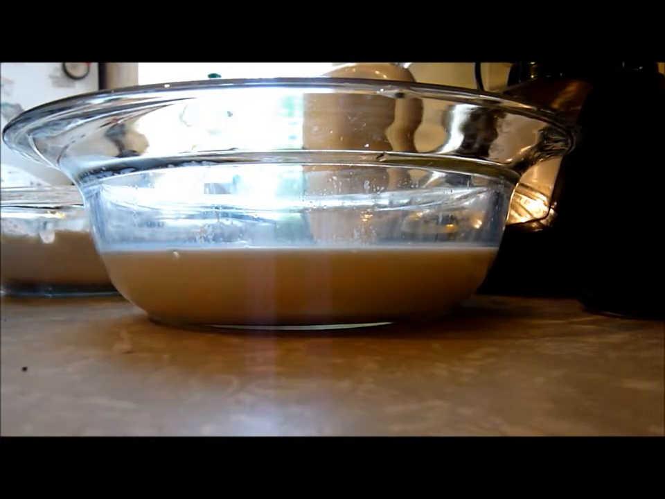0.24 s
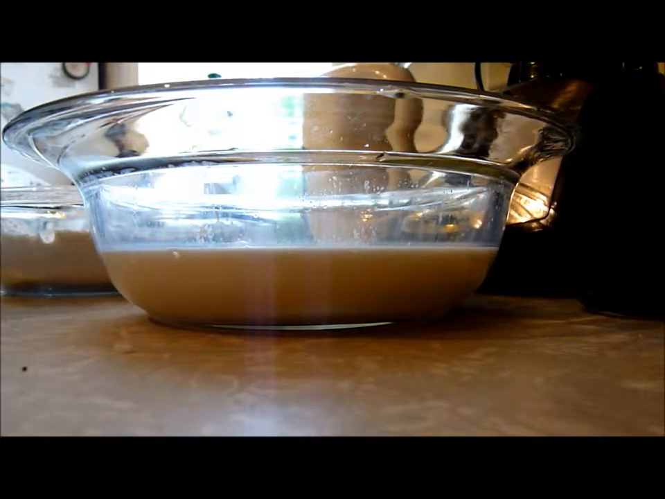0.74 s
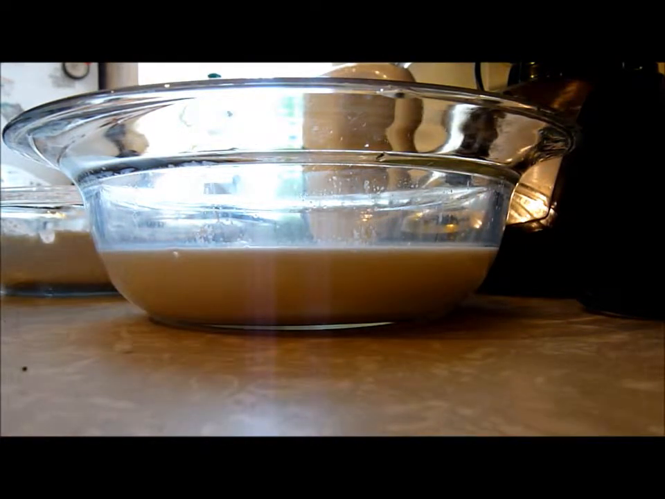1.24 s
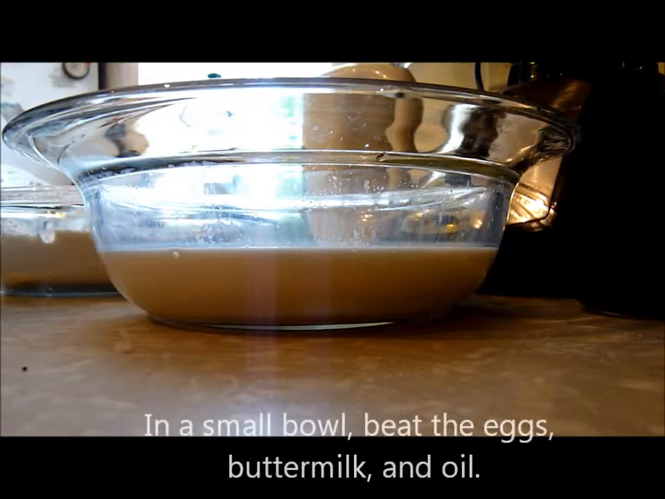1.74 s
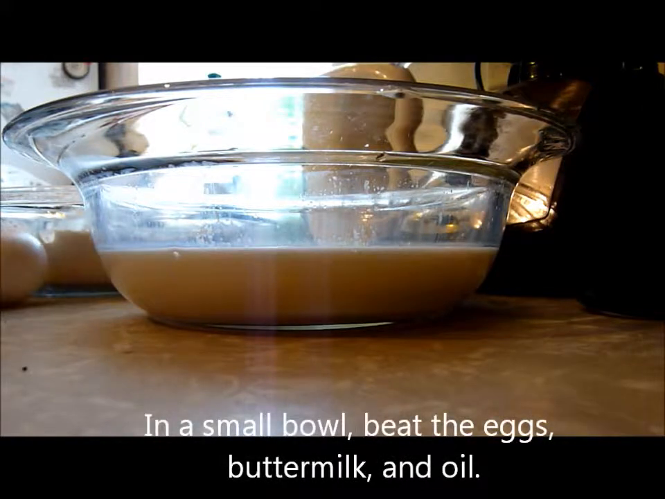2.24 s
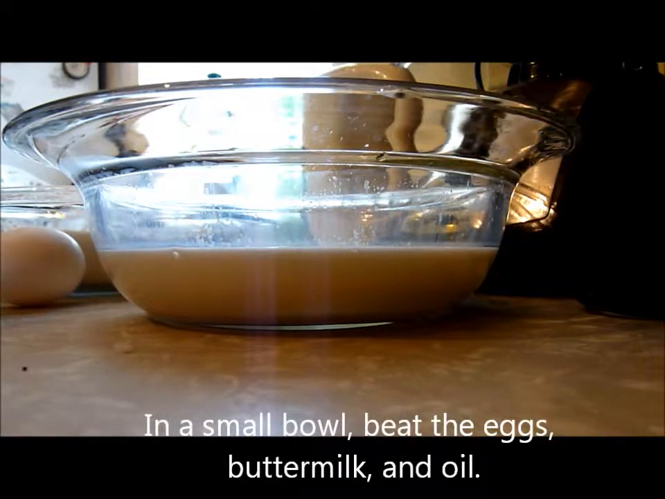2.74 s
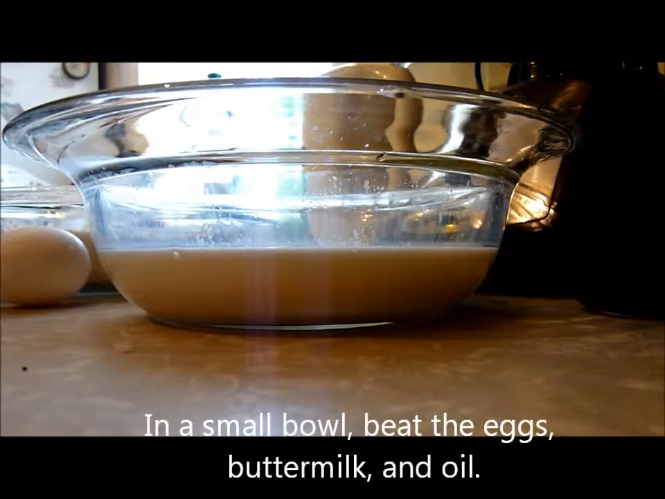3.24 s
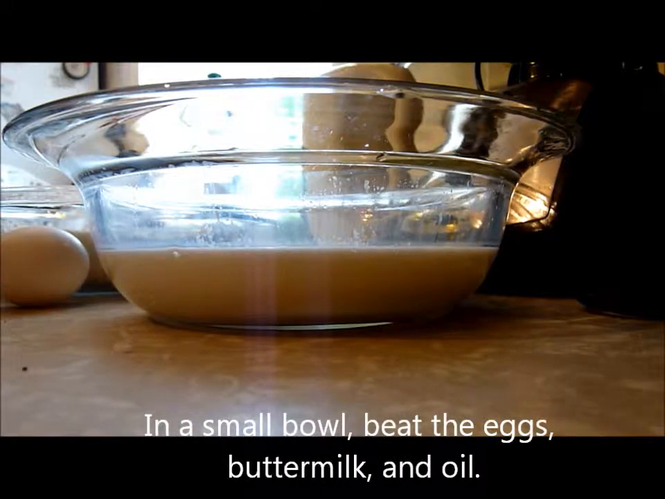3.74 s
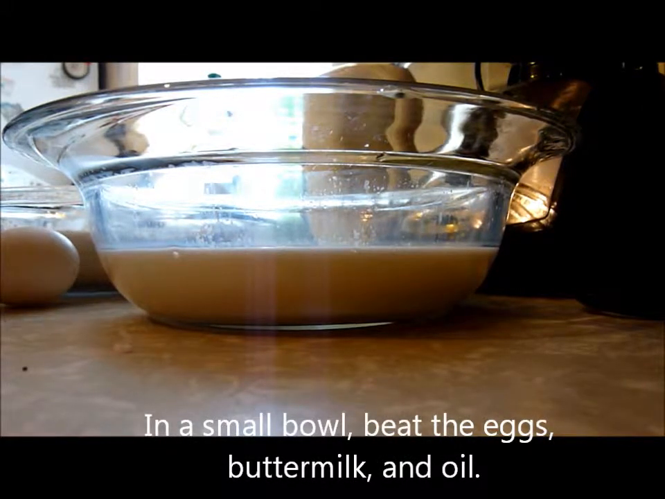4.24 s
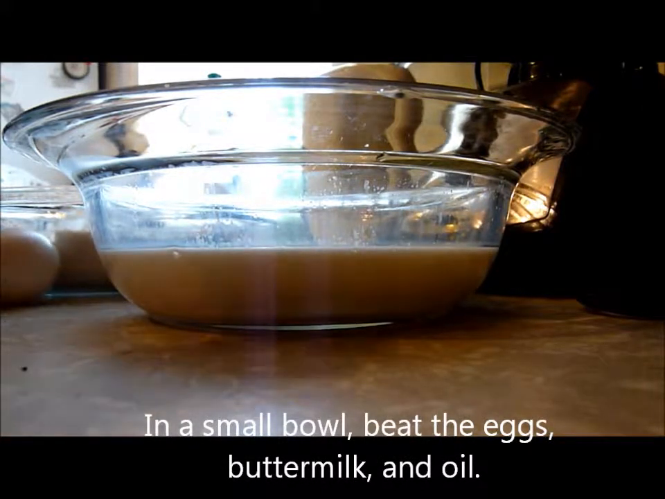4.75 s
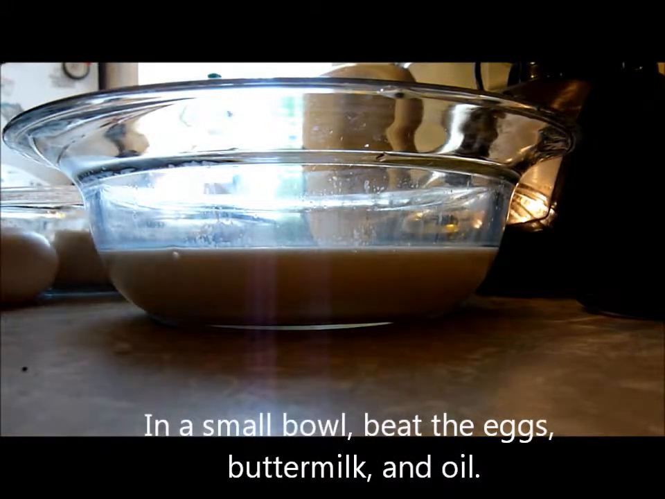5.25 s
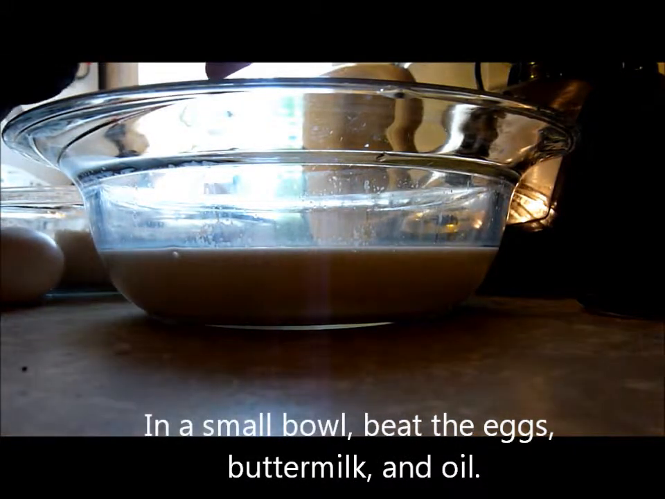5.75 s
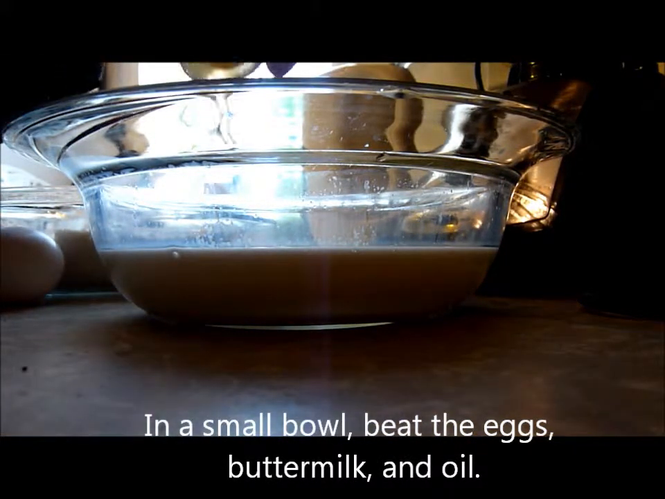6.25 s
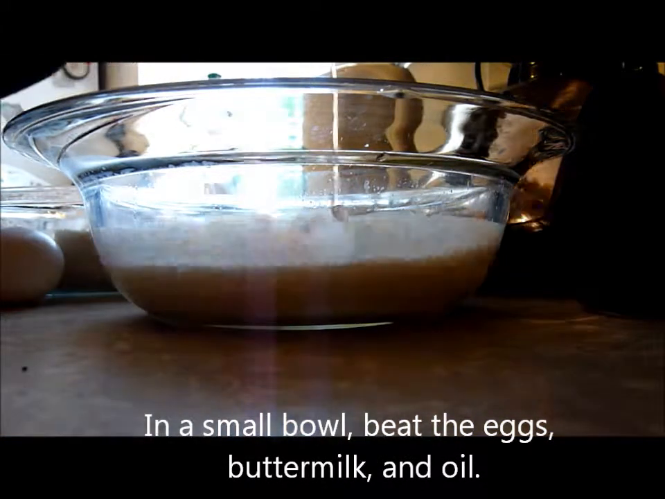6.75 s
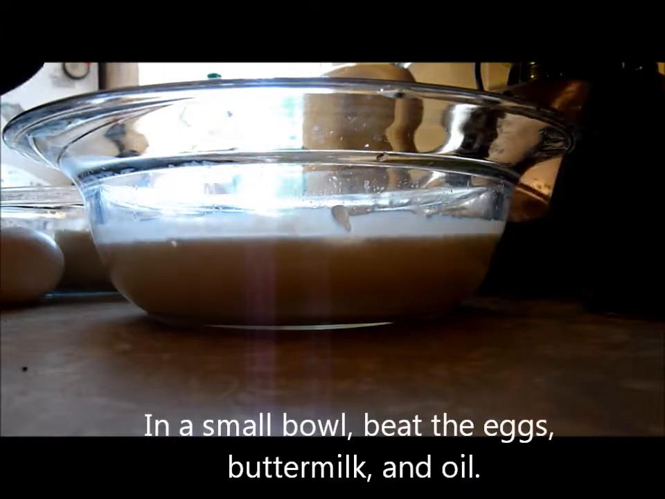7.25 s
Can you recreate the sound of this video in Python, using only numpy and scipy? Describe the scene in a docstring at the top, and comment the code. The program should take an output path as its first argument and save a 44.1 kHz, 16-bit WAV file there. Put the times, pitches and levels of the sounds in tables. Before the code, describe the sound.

A dish rattles down, then an egg is knocked five times on a worktop, cracked open and plopped into milk.

```python
"""First comes the hush of a kitchen: a fridge hums and hands brush the worktop. A dish is put down and
rattles, ringing each time it lands. Eggs are laid down gently and rock. One is knocked five times:
the worktop thuds and the shell crunches. The shell is prised open in sharp cracks that ring its hollow,
and gives a falling chirp as the egg plops into a bowl of milk. The room adds a short echo."""
import sys
import numpy as np
from scipy import signal
from scipy.fft import rfft, irfft
from scipy.io import wavfile
from scipy.ndimage import uniform_filter1d, map_coordinates

SR = 44100
rng = np.random.default_rng(int(sys.argv[2]) if len(sys.argv) > 2 else 0)


def unload_wav(signal):
    """Save mono or channel-first audio to the path in sys.argv[1] as 16-bit WAV at rate SR, clipped to [-1, 1]."""
    wavfile.write(
        sys.argv[1],
        SR,
        np.round(np.clip(np.atleast_2d(signal).T, -1, 1) * 32767).astype(np.int16),
    )


N = 331191
T = np.arange(N) / SR


def gain(db):
    return 10 ** (np.asarray(db) / 20)


def normalise(x):
    return x / np.sqrt(np.mean(x ** 2))


def cut_bass(x, hz):
    return signal.sosfilt(signal.butter(2, hz, "high", fs=SR, output="sos"), x)


def tone_curve(colour, size):
    """Join (pitch_hz, level_db) points into a gain for every frequency."""
    hz, db = np.transpose(colour)
    return gain(np.interp(np.log(np.arange(size // 2 + 1) * SR / size + 1), np.log(hz + 1), db))


def noise(colour, size=N):
    """Noise of strength 1, shaped by (pitch_hz, level_db) points."""
    return normalise(irfft(rfft(rng.standard_normal(size)) * tone_curve(colour, size), size))


def fade(t, fade_s):
    """Die away by 60 dB in fade_s."""
    return gain(-60 * t / max(fade_s, .002))


def swell(strokes, rise_s):
    """Each stroke climbs 60 dB in rise_s, then fades."""
    loudness = sum(gain(db - 60 * np.where(T < s, (s - T) / rise_s, (T - s) / max(fade_s, .02)))
                   for s, db, fade_s in strokes)
    return uniform_filter1d(loudness, size=300)


def grit(slips_per_s, scatter_db, slip_ms):
    """Uneven loudness from tiny slips, each a short puff of its own size."""
    slips = (rng.random(N) < slips_per_s / SR) * gain(scatter_db * rng.exponential(size=N))
    return normalise(signal.lfilter([1], [1, -np.exp(-1000 / (slip_ms * SR))], slips))


def flurry(ms):
    """Loudness of a quick run of small contacts: a fast rise and a slower fall."""
    progress = T[:SR // 10] * 1000 / max(ms, .1)
    return progress * np.exp(-2 * progress)


def ring(tones, scatter_db):
    """A struck object rings with its own tones; each blow lands elsewhere and mixes them anew."""
    t = T[:SR // 2]
    chance = rng.standard_normal((len(tones), 2))
    return sum(gain(db + scatter_db * a) * fade(t, fade_s) * np.sin(2 * np.pi * hz * (1 + .0039 * b) * t)
               for (hz, db, fade_s), (a, b) in zip(tones, chance))


def add(track, start_s, sound, peak_db):
    i = int(start_s * SR)
    sound = sound[:N - i]
    track[i:i + len(sound)] += gain(peak_db) * sound / np.max(np.abs(sound))


# Background loudness over time: time_s, rumble_db, hiss_db
ROOM_LEVELS = [(0, -67, -72), (.15, -75.5, -80), (.44, -69, -74), (1.05, -73.5, -76.5), (1.8, -69, -79.5),
               (2.3, -72, -79.5), (2.6, -67.5, -79.5), (2.9, -69, -73.5), (3.398, -73.5, -82.5),
               (4.55, -71.5, -78), (5.08, -67, -78.5), (5.5, -69.5, -77), (5.9, -70, -78.5),
               (7.0, -71.5, -76), (7.51, -70, -85)]
# Colours (how much bass and treble) of the rumble and the hiss: pitch_hz, level_db
RUMBLE_COLOUR = [(15, -50), (25, -5), (123, -7), (268, -9), (313, -1.5), (427, -6.5), (605, -2.5),
                 (893, -7.5), (965, -9.5), (1910, -20), (2600, -69), (3380, -58.5), (5720, -120)]
HISS_COLOUR = [(1180, -16), (2000, 0.5), (2410, -1.5), (2630, -7.5), (3000, -3), (14100, -11), (16500, -27)]
# Fridge hum: pitch_hz, width_hz, level_db
FRIDGE_BANDS = [(129.8, 14, -82), (294.8, 14, -81.5), (974, 1.5, -85.5), (1067.6, 11, -85)]
def room_tone():
    """Distant rumble and hiss rise and fall; a fridge hums in narrow wavering bands."""
    times, rumble_db, hiss_db = np.transpose(ROOM_LEVELS)
    hum = sum(gain(db) * noise([(hz - 3 * width, -60), (hz - width, -12), (hz, 0),
                                (hz + width, -12), (hz + 3 * width, -60)])
              for hz, width, db in FRIDGE_BANDS)
    rumble = gain(np.interp(T, times, rumble_db)) * noise(RUMBLE_COLOUR)
    hiss = gain(np.interp(T, times, hiss_db)) * noise(HISS_COLOUR)
    return rumble + hiss + hum


# The kitchen's echo: pitch_hz, fade_s, level_db
ECHO_BANDS = [(88, 0.52, 4.5), (270, 0.33, 2), (680, 0.32, 3.5), (2160, 0.31, 1.5), (5800, 0.31, 1.5),
              (11500, 0.2, 6)]
def kitchen_echo():
    """Reflections blur into bands of noise, each fading at its own speed."""
    t = T[:SR // 2]
    tail = np.zeros(len(t))
    for hz, fade_s, db in ECHO_BANDS:
        band = noise([(hz / 3, -30), (hz / np.sqrt(3), 0), (hz * np.sqrt(3), 0), (hz * 3, -30)], len(t))
        tail += gain(db) * fade(t, fade_s) * band * np.sqrt(hz)
    return normalise(tail * (1 - fade(t, 0.028))) / np.sqrt(len(t))


def shimmer(echo, pitch_spread=0.0244, hold_ms=8.0):
    """The knocks' echo shimmers slightly in pitch, so its tail fades smoothly."""
    hold = int(hold_ms * SR / 1000)
    speed = uniform_filter1d(np.repeat(rng.standard_normal(N // hold + 1), hold)[:N], hold)
    drift = signal.lfilter([1], [1, -np.exp(-20 / SR)], pitch_spread * normalise(speed))
    return np.array([map_coordinates(channel, [np.arange(N) + drift], mode="mirror") for channel in echo])


# Hands and shell halves brushing: peak_s, level_db, fade_s
BRUSH_STROKES = [(.184, -66, 3), (.386, -63, 0.18), (.474, -61, 0.5), (.62, -65.5, 0.067),
                 (2.62, -59.5, 0.14), (2.658, -59.5, 0.033), (2.712, -62, 0.21), (3.15, -71, 0.15),
                 (3.204, -64.5, 0.34), (5.04, -69.5, 1.1), (6.438, -62.5, 0.18), (6.556, -56.5, 0.43)]
# Rubbing on the worktop: pitch_hz, level_db
RUB_COLOUR = [(60, -17), (200, 1), (500, 2.5), (1100, -0.5), (2200, -9.5), (4000, -14.5), (15000, -33)]
def brushing():
    """Light strokes catch and slip, making a dull, gritty rub."""
    return swell(BRUSH_STROKES, rise_s=0.096) * grit(700, 2.6, slip_ms=28) * noise(RUB_COLOUR)


# Eggs rocking: peak_s, level_db, fade_s
EGG_ROCKS = [(1.66, -63, 1), (1.988, -65, .4), (2.25, -67, 0.5), (2.5, -69, 0.5), (2.648, -61, 0.52),
             (2.878, -76, 0.25), (3.19, -70.5, 0.25), (4.712, -67.5, .3)]
def rocking_eggs():
    """Rocking eggs keep the worktop humming near 315 Hz."""
    hum = noise([(100, -70), (280, -10), (315, 0), (350, -10), (1000, -90)])
    return swell(EGG_ROCKS, rise_s=0.31) * hum


# The worktop's own tones: pitch_hz, level_db, fade_s
WORKTOP_TONES = [(48, -11, 0.27), (74.6, -11, 0.15), (120, -44, 0.21), (153, -12, 0.13), (200, -17.5, 0.22),
                 (240, -51.5, 0.032), (322, -4.5, 0.11), (339.6, -15, 0.12), (405.6, -5, 0.081),
                 (497.5, -10, 0.13), (590, -5.5, 0.043), (733, -4.5, 0.057), (778, 0.5, 0.058),
                 (842, -19, 0.12), (981, -10.5, 0.038), (1122, -3, 0.1), (1243, 18.5, 0.015),
                 (1283, 5.5, 0.032), (1482, 16, 0.025), (1760, -2, .05), (2000, 1, 0.085)]
def worktop(blows, crunch_colour, crunch_fade_s, focus_db, air_slap, blur_db, thump_db):
    """An egg's push slaps the air and rings the worktop; the shell adds a short crunch or rub."""
    out, t = np.zeros(N), T[:SR // 10]
    for s, db, crunch_db, contact_ms, spot_hz, boom_db, crumple_ms in blows:
        push = flurry(contact_ms)[:SR // 100]
        # the spot favours tones near its own pitch; the deepest come from the cupboard below
        tones = [(hz, level + (boom_db if hz < 100 else -focus_db * np.log2(hz / spot_hz) ** 2), fade_s)
                 for hz, level, fade_s in WORKTOP_TONES]
        # the spot gives once, 2 dB less for each ms that the shell crumples
        thump = ring([(spot_hz, thump_db - 2 * crumple_ms, .018)], scatter_db=0)
        board = -ring(tones, scatter_db=4.1) - cut_bass(thump, spot_hz * 0.47)
        # air is sucked in, then pushed back a millisecond later
        board[[0, SR // 1000]] += air_slap * np.array([-1, 1])
        # countless weaker tones blur into a short dull noise
        blur = [(spot_hz / 5, -30), (spot_hz / 2, -4), (spot_hz, 0), (spot_hz * 2, -4), (spot_hz * 5, -16)]
        board += gain(blur_db) * fade(T[:SR // 2], 0.074) * noise(blur, SR // 2)
        # a denting shell gives way in steps, spreading out the force
        steps = flurry(crumple_ms) * (rng.random(len(t)) < .03)
        steps *= rng.standard_normal(len(t)) * min(1.07 * crumple_ms, 4)
        steps[0] = 1
        thud = cut_bass(np.convolve(board, push), 40)
        add(out, s, signal.fftconvolve(thud, steps), db)
        crunch = (fade(t, crunch_fade_s) + 6.3 * flurry(crumple_ms)) * noise(crunch_colour, len(t))
        add(out, s, crunch, db + crunch_db)
    return out


# Soft touches: start_s, thud_db, rub_over_thud_db, spot_pitch_hz, spread_ms
TOUCHES = [(0.961, -52, 11, 550, 8.8), (1.317, -49, 8, 610, 16.4), (1.732, -53.5, -13, 890, 3.2),
           (2.398, -32, -38, 296, 2.96), (2.471, -54, -21, 317, 3.1), (2.55, -53, -12, 322, 3.3),
           (2.646, -47, -30, 342, 3.6), (2.708, -55, -3, 500, 8.8), (4.701, -60, -30, 312, 20)]
def gentle_touches(contact_ms=0.33, boom_db=-25):
    """Eggs and dish meet the worktop softly, mostly ringing the spot they touch."""
    blows = [(s, db, rub_db, contact_ms, hz, boom_db, ms) for s, db, rub_db, hz, ms in TOUCHES]
    taps = worktop(blows, RUB_COLOUR, crunch_fade_s=0.016, focus_db=23.5,
                   air_slap=4.1, blur_db=-5.5, thump_db=4)
    return cut_bass(taps, 96)


# The dish landing: start_s, ring_db, scrape_offset_db, spread_ms, high_tone_boost_db
DISH_LANDINGS = [(1.141, -22.5, 0.5, 8.4, 13.5), (1.156, -30, -7, 5.6, 6), (1.258, -44, -30, 8.5, -2),
                 (1.363, -24.5, 2, 8.1, -17), (1.418, -24.5, -13, 8.5, 5), (1.495, -35.5, -10, 0.57, -19)]
# The dish's own tones: pitch_hz, level_db, fade_s
DISH_TONES = [(471, -18, 0.24), (772, -11.5, 0.36), (786, -16, 0.24), (1173, -7, 0.076), (1452, 3.5, 0.095),
              (1455, -4, 0.11), (1944, -27, .1), (1997, -20.5, 0.27), (2324, -29, 0.48), (2890, -17, 0.087),
              (3340, -32, 0.068), (3644, -19, 0.086), (4350, -22.5, 0.089), (5350, -27.5, 0.13),
              (6400, -24.5, 0.082), (7430, -17, 0.054)]
# Its foot scraping: pitch_hz, level_db
SCRAPE_COLOUR = [(59, -50.5), (100, -33.5), (524, -2), (854, -4), (1480, 0), (2370, -4), (2580, 0),
                 (2930, -1.5), (13500, -12.5), (16000, -52.5)]
# Its foot dragging after a landing: peak_s, strength_db, fade_s
FOOT_DRAGS = [(1.15, -37, 0.63), (1.372, -30.5, 0.76), (1.5, -35.5, 0.24), (1.56, -43.5, 0.14),
              (1.6, -52.5, 0.081)]
def dish():
    """Each landing rings the dish; the dragging foot scrapes and keeps it ringing."""
    landings = np.zeros(N)
    for s, db, scrape_db, ms, boost_db in DISH_LANDINGS:
        contacts = flurry(ms)
        tones = [(hz, level + boost_db * (hz > 1600), fade_s) for hz, level, fade_s in DISH_TONES]
        build_up = 1 - fade(T[:SR // 2], ms * 0.0069)  # the ring grows while the contacts last
        add(landings, s, ring(tones, scatter_db=1) * build_up, db)
        add(landings, s, contacts * noise(SCRAPE_COLOUR, len(contacts)), db + scrape_db + 3.5)
    drag = swell(FOOT_DRAGS, rise_s=0.041) * grit(1700, 0.98, slip_ms=10)
    # dragging shakes the tones more evenly than a blow does
    even_ring = normalise(ring([(hz, db / 2, fade_s) for hz, db, fade_s in DISH_TONES], scatter_db=0))
    ringing = signal.fftconvolve(drag * rng.standard_normal(N), even_ring)[:N]
    scrape = drag * noise([(hz, db - 2.02 * np.log2(hz / 2000)) for hz, db in SCRAPE_COLOUR])
    return cut_bass(landings, 490) + gain(-7) * scrape + gain(-58.5) * ringing


# Plops, squelches and the shell's chirp: start_s, level_db, pitch_hz, fade_s, glide_per_s (above 0 rises)
PLOP_TONES = [(6.449, -60.5, 130, 0.041, 1), (6.534, -42.5, 2470, 0.03, -7.5),
              (6.548, -49, 191, 0.069, -0.5), (6.548, -42, 440, 0.021, 2), (6.557, -42, 604, 0.095, 0.3),
              (6.574, -46, 1227, 0.055, 2), (6.619, -54, 625, 0.061, 2.5), (6.63, -61, 3310, 0.07, -0.5)]
def plops():
    """The shell's hollow gives a short falling chirp as the egg plops in with wet, sliding tones."""
    out, t = np.zeros(N), T[:SR // 6]
    for s, db, hz, fade_s, glide in PLOP_TONES:
        wobble = 1 + 0.32 * noise([(20, 3), (150, 2), (400, -37)], len(t))
        loudness = wobble * fade(t, fade_s) * (1 - fade(t, 0.0089))
        add(out, s, loudness * np.sin(2 * np.pi * hz * t * (1 + glide * t)), db)
    return out


# Shell halves pressed together: peak_s, level_db, fade_s
SHELL_PRESSES = [(7.48, -58, 0.24)]
# Their rasp: pitch_hz, level_db
RASP_COLOUR = [(590, -69), (1000, -22), (1160, -15), (2080, 0.5), (2590, -15), (3300, -14), (4570, -21),
               (11300, -18.5), (16000, -32)]
def shell_rub():
    """The two halves rasp against each other in tiny slips."""
    return swell(SHELL_PRESSES, rise_s=0.29) * grit(2800, 2.7, slip_ms=3.7) * noise(RASP_COLOUR)


# The shell bending: peak_s, level_db, fade_s
SHELL_BENDS = [(5.7, -77, 0.24), (6.1, -65, 1), (6.45, -65.5, 0.75), (7.17, -73, 0.33)]
# Snapping shell: pitch_hz, level_db
SHELL_COLOUR = [(600, -4), (1200, -10), (2500, -6), (3600, -4), (4600, -6.5), (5800, 1), (8000, -3.5),
                (13400, -11), (15300, -20), (16500, -8.5)]
def shell_crackle():
    """The bent shell gives off tiny snaps."""
    return swell(SHELL_BENDS, rise_s=0.62) * grit(600, 2.6, slip_ms=1.5) * noise(SHELL_COLOUR)


# Ticks and cracks: start_s, strength_db, treble_tilt_db_per_octave
SHELL_CRACKS = [(.961, -49, -5), (2.396, -47.5, 3.5), (5.025, -59, 3), (5.185, -56, 6), (5.3125, -47.5, 10),
                (5.3412, -46, 0.2), (5.522, -58, 7), (5.6062, -41, 3.5), (5.657, -48.5, 6),
                (5.693, -47.5, 15), (5.704, -46.5, 11), (5.853, -36.5, 9), (5.927, -36, 5),
                (5.9478, -39, 4), (5.9805, -30.5, 3.5), (6.0373, -30, 3), (6.0875, -27, 5.2),
                (6.103, -36.5, -4.5), (6.1437, -27, 2), (6.1594, -35, 1.5), (6.1963, -43, 5),
                (6.2746, -35, -0.5), (6.3044, -46, 16), (6.3269, -36.5, 7), (6.375, -47, -3),
                (6.392, -33.5, 1), (6.436, -43, 14), (6.5315, -42, 6.5), (6.6139, -40, 6.5),
                (6.6533, -54, 2), (6.7675, -58, 3), (7.0011, -43, 0.5), (7.0462, -41, 11.5),
                (7.1234, -42, 22), (7.1395, -49, 3), (7.1495, -31.5, 12), (7.1785, -51, 14),
                (7.212, -27.5, 2.5), (7.2181, -32, 7.5), (7.2362, -39, 9), (7.5004, -45, 11)]
# The shell as it opens: time_s, hollow_pitch_hz, hollow_offset_db, snap_over_splinters_db
SHELL_OPENING = [(5.3, 1380, -29, 6), (5.7, 1730, -25, 6), (6.04, 1460, -43, 7.5), (6.12, 1482, -8, 9),
                 (6.25, 1427, 6.5, 5), (6.34, 1407, -15.5, 6), (6.44, 1533, -4, 8), (6.53, 2036, 2, 6),
                 (7.0, 1724, -16.5, 10), (7.15, 2164, -18, 12), (7.22, 1634, -20, 15.5)]
def shell_cracks(splinter_fade_s=0.056, hollow_fade_s=0.07):
    """Each crack is a snap with splinters after it, and rings the hollow of the shell."""
    out, t = np.zeros(N), T[:SR // 6]
    times, *columns = np.transpose(SHELL_OPENING)
    for s, db, tilt_db in SHELL_CRACKS:
        hz, hollow_db, snap_db = (np.interp(s, times, column) for column in columns)
        splinters = np.repeat(gain(4 * rng.standard_normal(len(t) // 40 + 1)), 40)[:len(t)]
        loudness = gain(snap_db) * fade(t, .004) + fade(t, splinter_fade_s) * splinters
        colour = [(f, level + tilt_db * np.log2(f / 8000)) for f, level in SHELL_COLOUR]
        add(out, s, loudness * noise(colour, len(t)), db + 4)
        # the broken rim makes the hollow ring unevenly
        rim = [(hz * 0.62, -30), (hz * 0.94, -6), (hz, 0), (hz * 0.96, -6), (hz * 1.94, -30)]
        hollow = np.sin(2 * np.pi * hz * t) + 0.95 * noise(rim, len(t))
        add(out, s, fade(t, hollow_fade_s) * hollow, db + hollow_db)
    return cut_bass(out, 930)


# Knocks: start_s, thud_db, crunch_over_thud_db, contact_ms, spot_pitch_hz, boom_db, crumple_ms
EGG_KNOCKS = [(3.601, -13, -28, 0.17, 335, -16.5, 0.36), (3.787, -13.5, -3.5, 0.093, 914, -17, 0.59),
              (3.961, -23, -1.5, 0.45, 464, -18, 5.3), (4.153, -22, 0, 0.074, 760, 7, 7.6),
              (4.35, -23.5, 1.5, 0.26, 595, 10, 5.3)]
# The shell denting: pitch_hz, level_db
CRUNCH_COLOUR = [(1000, 0.5), (2200, 0), (3600, -3.5), (5000, -3.5), (5800, 1.5), (6900, -6.5), (13000, -8),
                 (16500, -14)]
def egg_knocks():
    """The egg hits the worktop five times; the last three blows crumple its shell for longer."""
    return worktop(EGG_KNOCKS, CRUNCH_COLOUR, crunch_fade_s=0.027, focus_db=2.5,
                   air_slap=22, blur_db=6.5, thump_db=14)


# Stereo width of the room: pitch_hz, side_over_mid_db
ROOM_WIDTH = [(60, -12), (110, -20.5), (200, -13.5), (380, -17), (700, -14.5), (1290, -7), (2380, -2),
              (4400, 0), (8120, -0.5), (15000, 4.5)]
def all_around(make, size):
    """Sound from everywhere: mid (what both ears share) and side (how they differ) are unrelated."""
    return np.array([make(), irfft(rfft(make()) * tone_curve(ROOM_WIDTH, size), size)])


def place(mid, width, lead_us, turn_rad, direct_db, scattered_db):
    """Sound from one direction: side is a time-shifted copy plus one scattered off things close by."""
    hz = np.arange(N // 2 + 1) * SR / N
    size = SR // 40
    scatter = normalise(fade(T[:size], 0.029) * cut_bass(rng.standard_normal(size), 2500)) / np.sqrt(size)
    shift = np.exp(1j * (2 * np.pi * hz * lead_us * 1e-6 + turn_rad))
    paths = gain(direct_db) * shift + gain(scattered_db) * rfft(scatter, N)
    return np.array([mid, irfft(rfft(mid) * tone_curve(width, N) * paths, N)])


# Stereo width beside the microphone, and further off in front: pitch_hz, side_db
NEAR_WIDTH = [(60, -10), (110, -9), (200, -5.5), (380, -13), (700, -10), (1290, -2), (2380, 4), (4400, 5.5),
              (8120, 7.5), (15000, 14)]
FAR_WIDTH = [(60, 0.5), (110, -7), (200, -11), (380, -15), (700, -6), (1290, -12.5), (2380, -1), (4400, -4),
             (8120, -5), (15000, 1)]
def scene():
    """Place the sounds in the kitchen, add its echo and return left and right."""
    knocks = egg_knocks()
    handling = gentle_touches() + dish() + rocking_eggs() + brushing()
    at_bowl = shell_cracks() + shell_rub() + shell_crackle() + plops()
    direct = (place(knocks, NEAR_WIDTH, lead_us=46, turn_rad=-1.68, direct_db=-8.5, scattered_db=-7.5)
              + place(handling, FAR_WIDTH, lead_us=20, turn_rad=-.3, direct_db=-14, scattered_db=1)
              + place(at_bowl, FAR_WIDTH, lead_us=48, turn_rad=1.9, direct_db=-14, scattered_db=-1))
    room = all_around(kitchen_echo, SR // 2)
    into_room = gain(-13) * handling + gain(-12.5) * at_bowl
    echo = signal.fftconvolve(into_room[None], room, axes=1)[:, :N]
    echo += shimmer(signal.fftconvolve(gain(-10.5) * knocks[None], room, axes=1)[:, :N])
    mid, side = direct + echo + all_around(room_tone, N)
    return np.array([mid + side, mid - side])


# Bands weakened by the microphone's case: pitch_hz, width_hz, level_db
CASE_DIPS = [(2591, 1010, -22.5), (4580, 830, -23), (7875, 400, -10.5)]
def record(dry, top_hz=15800):
    """The microphone loses the deep bass, its case dips three bands, and the highest treble is cut."""
    dry = cut_bass(dry, 64)
    for hz, width, db in CASE_DIPS:
        band = signal.lfilter(*signal.iirpeak(hz, hz / width, fs=SR), dry)
        dry = dry - (1 - gain(db)) * band
    return signal.sosfilt(signal.ellip(8, .2, 70, top_hz, fs=SR, output="sos"), dry)


dry = scene()
out = record(dry)
unload_wav(out)
```